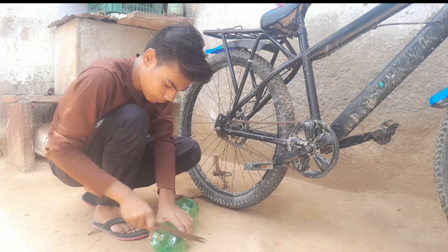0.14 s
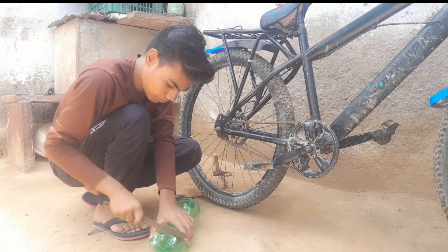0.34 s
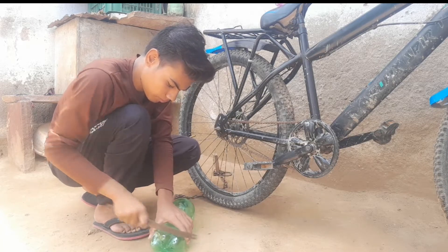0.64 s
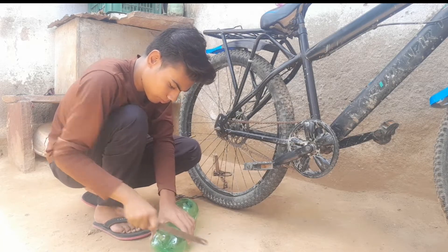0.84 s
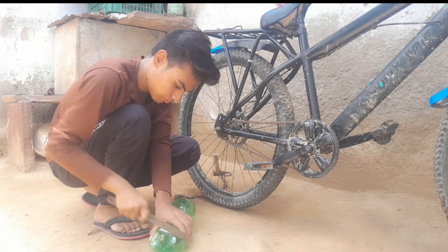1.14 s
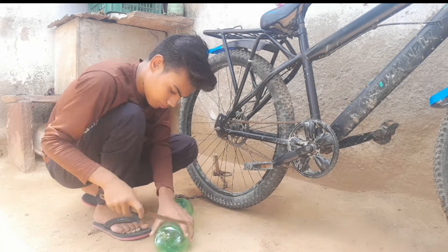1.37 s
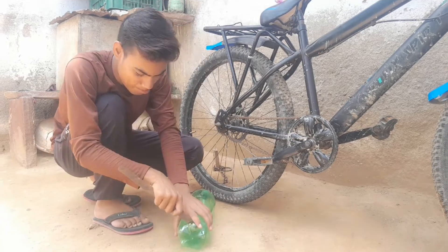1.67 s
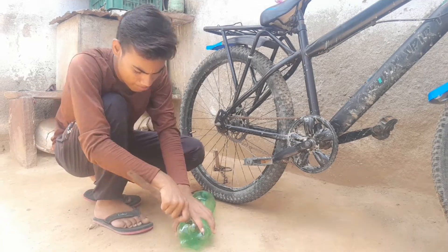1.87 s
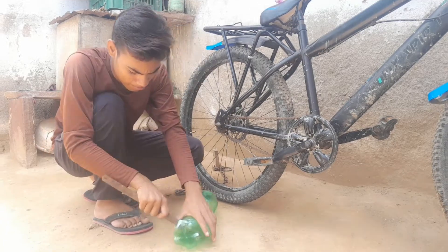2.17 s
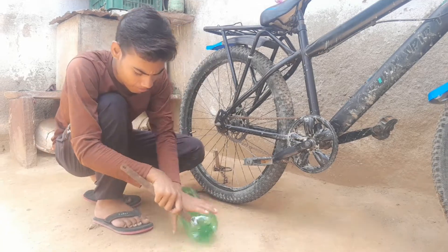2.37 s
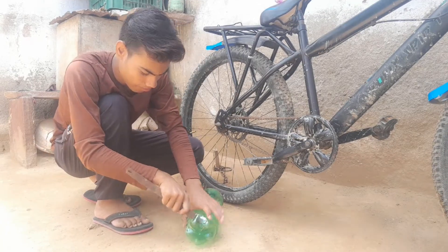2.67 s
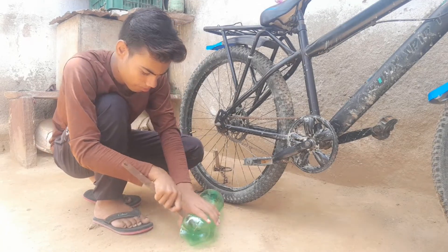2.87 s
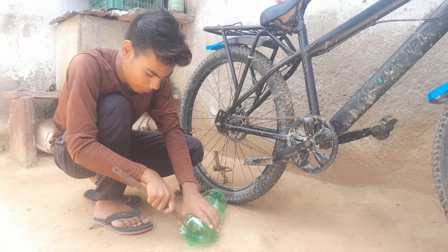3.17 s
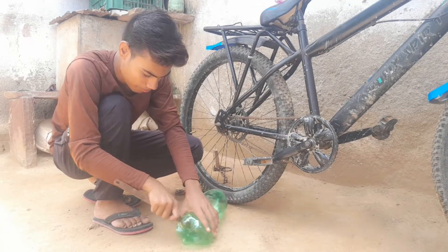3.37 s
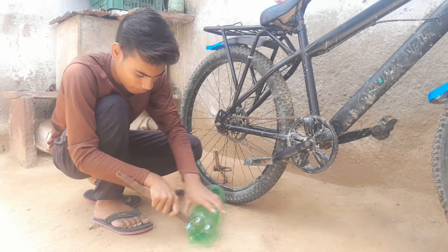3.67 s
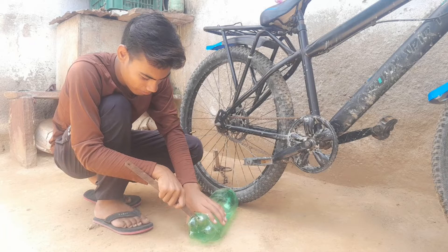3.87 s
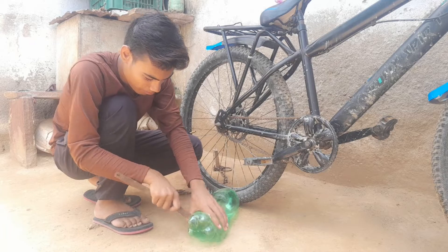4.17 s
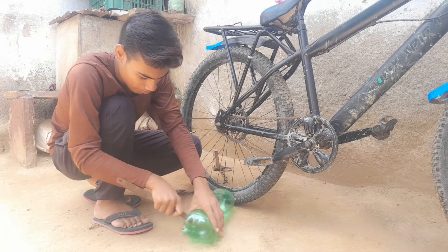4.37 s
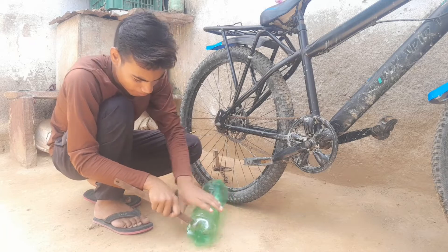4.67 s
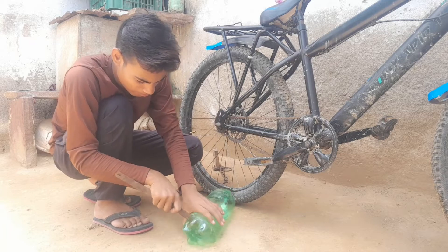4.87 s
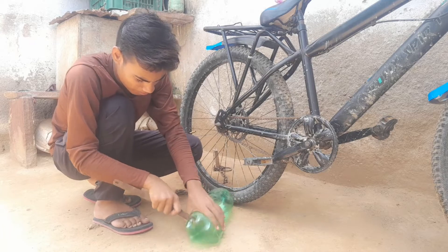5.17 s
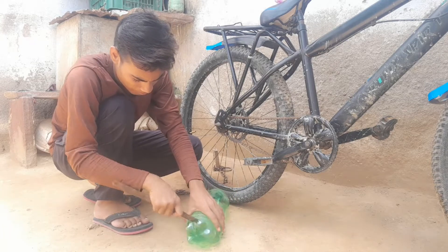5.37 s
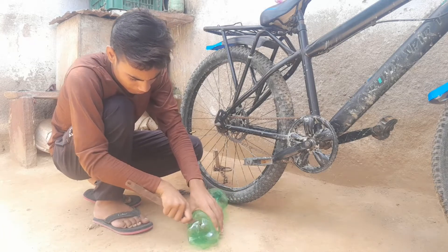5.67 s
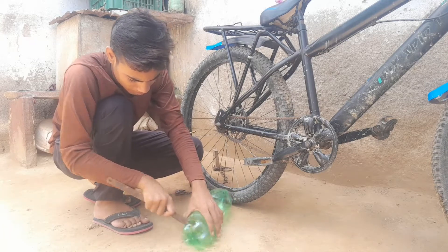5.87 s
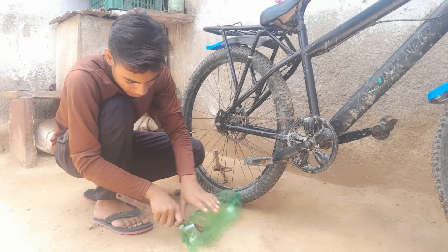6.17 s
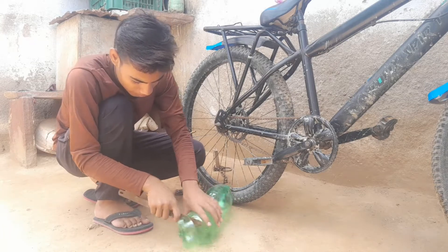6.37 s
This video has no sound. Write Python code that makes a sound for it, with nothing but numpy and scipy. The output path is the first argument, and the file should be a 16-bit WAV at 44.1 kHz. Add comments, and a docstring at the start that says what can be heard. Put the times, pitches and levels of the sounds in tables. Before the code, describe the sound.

Close stereo sound of a thin blade cutting an empty plastic bottle on sandy ground. Light, even sawing at about fifteen strokes a second lasts just over a second, with a faint dull bump. After a quieter moment come separate, uneven scrapes, hollow and raspy, among dry plastic snaps and one hollow knock. The strokes stop near six seconds, leaving faint rumble and rubbing in a walled yard.

```python
"""Cutting a plastic bottle in a yard

A thin blade cuts into an empty plastic bottle held on the ground of a walled yard, heard in stereo.
Quick light sawing gives way to single strokes, faint to hard: uneven noise forces ring the hollow shell.
Short noise bursts make the plastic snap, a decaying sine makes one hollow knock, and the walls answer.
Behind them are coloured noise for the bottle rubbing on the earth and an outdoor rumble, one dull bump,
and a faint mains hum of steady sines."""
import sys
import numpy as np
from scipy import signal
from scipy.fft import rfft, irfft, next_fast_len
from scipy.io import wavfile
from scipy.ndimage import map_coordinates

SR = 44100
rng = np.random.default_rng(int(sys.argv[2]) if len(sys.argv) > 2 else 0)


def unload_wav(signal):
    """Save mono or channel-first audio to the path in sys.argv[1] as 16-bit WAV at rate SR, clipped to [-1, 1]."""
    wavfile.write(
        sys.argv[1],
        SR,
        np.round(np.clip(np.atleast_2d(signal).T, -1, 1) * 32767).astype(np.int16),
    )


N = 287955

SIZE = 8192  # samples in one event
LEAD_S = 0.006  # silence ahead of each event
T = np.maximum(np.arange(SIZE) / SR - LEAD_S, 0)  # seconds since the event began
HZ = np.fft.rfftfreq(SIZE, 1 / SR)

# single strokes, from a last light sawing stroke and faint rubs to hard cuts;
# a hollow one flexes the whole bottle, a tearing one rasps, a loosely held one rings:
# start_s, end_s, level_db, hollowness_db, tearing_db, shell_ring_db, growth_db,
# belly_hz, wall_hz (resonances before the wall flexes)
STROKES = [(1.25, 1.296, -41, -3, -1.5, 1, -7, 630, 1530),
           (1.765, 1.837, -30.5, -9, 1.5, -3, -3, 803, 1266),
           (1.996, 2.036, -33, 9.5, -4.5, 0, 2, 760, 1200),
           (2.036, 2.059, -29.5, 3.5, 3.5, 9, 9, 710, 1290),
           (2.143, 2.164, -23.5, 0.5, 1, 10, 7, 520, 1206), (2.269, 2.306, -41, -3, 0, 14, -13, 600, 1360),
           (2.375, 2.394, -52, 3, -18, 14, -9, 497, 1260), (2.609, 2.672, -32, 2, -1, 7.5, 3, 382, 1310),
           (2.854, 2.885, -40, 1, -1.5, 17, 0, 644, 1320),
           (3.005, 3.049, -24.5, 1.5, -1, 7.5, -0.5, 603, 1380),
           (3.122, 3.21, -26.5, 2, -.5, 3.5, 1.5, 598, 1205),
           (3.283, 3.352, -24, -5, -2.5, 10.5, -2, 523, 1167),
           (3.397, 3.415, -34.5, 2, -1.5, 4, 11, 473, 1330), (3.492, 3.545, -29, 2, -2.5, 9, -4, 495, 1410),
           (3.608, 3.627, -29.5, -1, 1, 0, 15, 480, 1300), (4, 4.065, -27.5, -9, 1.5, 11, -2.5, 546, 1330),
           (4.139, 4.232, -30.5, 4, -0.5, 12, -3, 715, 1214),
           (4.308, 4.362, -26, -2.5, -1.5, 13.5, 0, 485, 1397),
           (4.502, 4.538, -29.5, 2, -2.5, 12, -5, 568, 1410),
           (4.97, 5.06, -26.5, -5.5, 0.5, 2.5, -2, 474, 1370),
           (5.11, 5.182, -33, 0, -2.5, 9, 10.5, 493, 1584), (5.273, 5.35, -41.5, 0, -4, 5, -5, 415, 1390),
           (5.505, 5.538, -34.5, 2.5, 2, 7, 4, 490, 1000), (5.584, 5.626, -47.5, 0, 0, 15, 7, 500, 1260),
           (5.651, 5.74, -27, -3, 1, 9, -9, 472, 1410), (5.83, 5.879, -29.5, 4, 2.5, 12, -6, 640, 1480),
           (5.961, 6.017, -25, 4.5, 2, 22, -1.5, 499, 1410), (6.063, 6.107, -43, 1, 0, 9, 2, 586, 1690)]


def amp(db):
    """Decibels to gain."""
    return 10 ** (np.asarray(db) / 20)


def unit(x):
    """Scale to rms 1."""
    return x / np.sqrt(np.mean(x ** 2) + 1e-20)


def along(points, hz):
    """Read (frequency in Hz, value) points on a log frequency axis."""
    point_hz, values = np.transpose(points)
    return np.interp(np.log(hz + 1), np.log(point_hz), values)


def over_time(points, seconds):
    """Read (time in s, value) points in straight lines."""
    return np.interp(seconds, *np.transpose(points))


def wobble(knots_per_s):
    """A smooth random curve through evenly spaced knots."""
    knots = rng.standard_normal(int(N * knots_per_s / SR) + 4)
    return map_coordinates(knots, [np.arange(N) * knots_per_s / SR])


def filtered(x, response):
    """Filter x by a gain that depends on frequency."""
    m = next_fast_len(N + SR // 2)
    spectrum = rfft(x, m) * response(np.fft.rfftfreq(m, 1 / SR))
    return irfft(spectrum, m)[..., :N]


def rush(colour):
    """Coloured noise of rms 1 (mid, side)."""
    noise = rng.standard_normal((2, N))
    return unit(filtered(noise, lambda hz: amp(along(colour, hz))))


def add(track, start_s, sound):
    """Mix in an event, with its lead-in, so that it starts at start_s."""
    first = max(round((start_s - LEAD_S) * SR), 0)
    part = track[:, first:][:, :SIZE]
    part += sound[:, :part.shape[1]]


def stereo(pair, width, left_db, bass_width=0.65):
    """Mid and side to left and right; the long waves reach both microphones more alike."""
    mid, side = pair
    side = width * filtered(side, lambda hz: along([(500, bass_width), (2200, 0.9)], hz))
    return np.array([mid + side, mid - side]) * amp([[left_db / 2], [-left_db / 2]])


def body(colour, modes):
    """Causal, minimum-phase response of the bottle: a broad colour lifted or lowered at each mode."""
    db = along(colour, HZ)
    for hz, width_hz, lift_db in modes:
        db = db + lift_db / (1 + ((HZ - hz) / width_hz) ** 2)
    # folding the cepstrum onto positive time leaves no sound ahead of the force
    cepstrum = irfft(np.log(amp(db)))
    cepstrum[1:SIZE // 2] *= 2
    cepstrum[SIZE // 2 + 1:] = 0
    return np.exp(rfft(cepstrum))


def lasting(x, length_s):
    """Give each row the energy of rms 1 held for length_s."""
    energy = np.sum(x ** 2, axis=-1, keepdims=True)
    return x * np.sqrt(length_s * SR / energy)


def range_levels(table, level_db, *colours_db):
    """Levels of belly, wall, rasp and hiss for one event of a given strength and colour."""
    return [level_db + offset_db + np.dot(slopes, colours_db) for offset_db, *slopes in table]


def ring(spectrum, levels_db, length_s):
    """Sound the bottle, with its belly, wall, rasp and hiss ranges each at its own strength."""
    # borders between the four ranges: border_hz
    borders_hz = [930, 2000, 3900]
    below = [1 / (1 + (HZ / hz) ** 20) for hz in borders_hz]
    bands = np.diff([0 * HZ, *below, 0 * HZ + 1], axis=0)
    sound = 0
    for level_db, band in zip(levels_db, bands):
        sound = sound + amp(level_db) * lasting(irfft(spectrum * band), length_s)
    return sound


def drag(length_s, growth_db, swell_db, attack_s, release_s, catches_per_s, catch_life_s, slide):
    """Force of one stroke (mid, side): the edge catches at uneven moments and slides in between."""
    u = np.clip(2 * T / length_s - 1, -1, 1)  # -1 at the start of the stroke, 1 at its end
    pressure = amp(growth_db * u / 2 - swell_db * u ** 2)
    pressure *= 1 - np.exp(-T / attack_s)
    pressure *= np.exp(-np.maximum(T - length_s, 0) / release_s)
    catches = (rng.random(SIZE) < catches_per_s / SR) * rng.uniform(0.77, 1, SIZE)
    tearing = unit(signal.lfilter([1], [1, -np.exp(-1 / (catch_life_s * SR))], catches))
    return pressure * (tearing + slide) * rng.standard_normal((2, SIZE))


def strokes(belly_lift_db=13, wall_lift_db=12, flex=0.037, swell_db_per_s=70, grazing_swell=0.32):
    """Single strokes on the wall; the grip sets the two lowest modes, long grazing ones swell midway."""
    # broad colour of the scraping: hz, level_db
    scrape = [(60, -30.5), (150, -23.5), (300, -8), (400, 0.5), (700, 3), (1000, -3), (1300, 2), (2000, -3),
              (3000, -7), (5500, -9.5), (7000, -21), (8800, -37), (10000, -58.5)]
    # higher resonances that ring alike in every stroke: hz, width_hz, lift_db
    shell = [(1704, 37, 7), (4160, 15, 6), (5200, 45, 7)]
    # two valleys and one slight lift between the resonances of the shell: hz, width_hz, lift_db
    between = [(900, 36, -5.5), (2150, 60, -2), (3080, 77, 0.5)]
    # as the cut lengthens the upper shell rings more freely:
    # hz, width_hz, lift_at_time_zero_db, growth_db_per_s
    loosening = [(3455, 68, -2, 2), (3540, 50, -3.5, 2)]
    # belly, wall, rasp and hiss of a stroke: offset_db, db_per_db_of_hollowness, db_per_db_of_tearing
    balance = [(-4, 1.1, .1), (0.04, -0.2, -0.63), (-3, -0.08, 1.14), (-8, -0.52, .5)]
    track = np.zeros((2, N))
    for start_s, end_s, level_db, hollow_db, tear_db, shell_db, growth_db, belly_hz, wall_hz in STROKES:
        length_s = end_s - start_s
        swell_db = swell_db_per_s * length_s - grazing_swell * hollow_db
        force = drag(length_s, growth_db, swell_db, attack_s=0.0006, release_s=0.0041,
                     catches_per_s=450, catch_life_s=0.0012, slide=1.0)
        upper = [(hz, width_hz, lift_db + rise * start_s) for hz, width_hz, lift_db, rise in loosening]
        steady = [(2515, 70, shell_db), *upper, *shell, *between]
        # the wall flexes under the blade, so its resonances slide during the stroke
        responses = []
        for bend in np.exp(flex * rng.standard_normal(2)):
            lowest = [(belly_hz * bend, 65, belly_lift_db), (wall_hz * bend, 90, wall_lift_db)]
            responses.append(body(scrape, [*lowest, *steady]))
        early, late = responses
        progress = np.clip(T / length_s, 0, 1)
        spectrum = rfft(force * (1 - progress)) * early + rfft(force * progress) * late
        levels_db = range_levels(balance, level_db, hollow_db, tear_db)
        add(track, start_s, ring(spectrum, levels_db, length_s))
    return stereo(track, width=0.58, left_db=2.0)


def sawing(count=18, first_middle_s=0.058, strokes_per_s=15.15, bite_share=0.54, level_db=-3.0,
           uneven_db=0.8, swell_db=4.0, uneven_swell_db=3, drift=0.033, extra_lift_db=0.5, vary_db=1.05):
    """The blade nicks back and forth at an even pace, each stroke biting and ringing a bit differently."""
    # how hard the blade is pressed, ahead of the overall level: time_s, relative_level_db
    effort = [(.05, -38), (.13, -35), (.4, -32.5), (.64, -31.5), (.9, -32.5), (1.19, -34)]
    # the still stiff bottle, ahead of drift and variation: hz, width_hz, lift_db
    stiff_modes = [(647, 71, 12.5), (1374, 170, 4.5), (2180, 85, 7), (2500, 190, 6.5), (3530, 73, 7),
                   (4180, 35, 8.5), (4820, 120, 9)]
    # broad colour of a nick: hz, level_db
    nick = [(100, -39), (300, -6.5), (600, -11.5), (900, -3.5), (1500, 0), (2000, -7), (2800, -2.5),
            (4000, -8), (5400, -8.5), (7000, -18.5), (8800, -36), (10000, -53)]
    track = np.zeros((2, N))
    length_s = bite_share / strokes_per_s
    for k, (strength, shape) in enumerate(rng.standard_normal((count, 2))):
        middle_s = first_middle_s + k / strokes_per_s
        stroke_db = over_time(effort, middle_s) + uneven_db * strength + level_db
        modes = []
        for hz, width_hz, lift_db in stiff_modes:
            drifted_hz = hz * np.exp(drift * rng.normal())
            modes.append((drifted_hz, width_hz, lift_db + extra_lift_db + vary_db * rng.normal()))
        force = drag(length_s, 0, swell_db + uneven_swell_db * shape, attack_s=0.001, release_s=0.0084,
                     catches_per_s=790, catch_life_s=0.002, slide=1.2)
        sound = irfft(rfft(force) * body(nick, modes))
        add(track, middle_s - length_s / 2, amp(stroke_db) * lasting(sound, length_s))
    return stereo(track, width=0.75, left_db=1.5, bass_width=1.0)


def snaps(burst_s=0.00075, length_s=0.008, creak_db=-25, creak_life_s=0.015):
    """Each snap is a millisecond burst that rings the shell, with a faint creak as the wall settles."""
    # the blade catches and the plastic snaps: peak_s, level_db, sharpness_db
    catches = [(1.1185, -41, 3), (1.2438, -37.5, 4), (1.34, -36, -2), (1.3812, -37.5, 12),
               (1.564, -49.5, 5.5), (1.6516, -48, 2.5), (1.7308, -48, 8.5), (1.7613, -37, 2.5),
               (1.8837, -40.5, -3.5), (1.9212, -33, -7), (1.9709, -44, -5), (1.9953, -31, -26),
               (2.1279, -22.5, -4.5), (2.2191, -32, -7), (2.2703, -34.5, -3), (2.3165, -36, 1.5),
               (2.4435, -42.5, -12), (2.5416, -45, -15), (2.5745, -34, -8), (2.5961, -29.5, 2),
               (2.6875, -27, 0), (2.7234, -45.5, 9), (2.8898, -28, -0.5), (2.944, -48, 1),
               (2.9813, -26.5, -7), (3.286, -33, 6), (3.3968, -32.5, -3.5), (3.4615, -35.5, -1),
               (3.4962, -27.5, -16), (3.6123, -32.5, 5), (3.7032, -36.5, -0.5), (3.7439, -41.5, 2),
               (3.942, -46, 1), (3.9936, -35, 11.5), (4.3046, -25.5, 0.5), (4.4041, -40, -8),
               (4.4459, -40, 6.5), (4.504, -28, -16), (4.5416, -24.5, -10), (4.5687, -42, 10),
               (4.8098, -36.5, 0.5), (4.8458, -30, 0), (4.9283, -42, -1), (5.251, -37.5, -2.5),
               (5.3137, -29.5, 4.5), (5.3457, -33, -1), (5.411, -38, 3), (5.4912, -34, 2.5),
               (5.5163, -32.5, -0.5), (5.6547, -29.5, 1), (5.7563, -32.5, 3), (5.7809, -39.5, 6),
               (5.805, -39, -5), (5.8768, -27.5, 6), (6.0575, -39.5, 12.5), (6.0877, -44, 7.5),
               (6.1839, -46, 6.5), (6.4261, -51.5, 0)]
    # broad colour of a snap: hz, level_db
    click = [(80, -42), (200, -29.5), (320, -4.5), (450, 5), (800, -0.5), (1300, 2), (2000, -1.5),
             (3000, -4.5), (5400, -5.5), (7000, -18.5), (8800, -32.5), (10000, -51)]
    # belly, wall, rasp and hiss of a snap: offset_db, db_per_db_of_sharpness
    balance = [(-6.5, 0.08), (-1.6, -0.2), (-5, 0.32), (-9, 1.07)]
    track = np.zeros((2, N))
    for peak_s, level_db, sharp_db in [*catches, *crackle()]:
        push = T / burst_s * np.exp(1 - T / burst_s)
        creak = amp(creak_db) * (T > 0) * np.exp(-T / creak_life_s)
        force = (push + creak) * rng.standard_normal((2, SIZE))
        bend = np.exp(0.034 * rng.standard_normal())
        response = body(click, [(490 * bend, 100, 7), (1300 * bend, 130, 9), (2510, 90, 4)])
        levels_db = range_levels(balance, level_db, sharp_db)
        add(track, peak_s - burst_s, ring(rfft(force) * response, levels_db, length_s))
    return stereo(track, width=0.26, left_db=2)


def crackle(below_db=-9, spread_db=3, count=24):
    """Small snaps at chance moments inside the single strokes: rows of peak_s, level_db, sharpness_db."""
    rows = []
    for which, when, size in rng.random((count, 3)):
        start_s, end_s, stroke_db, *_ = STROKES[int(which * len(STROKES))]
        level_db = stroke_db + below_db + spread_db * (2 * size - 1)
        rows.append((start_s + when * (end_s - start_s), level_db, 0))
    return rows


def pop(start_s=4.843, level_db=-15, hz=460, rise_s=0.0018, t60_s=0.039):
    """A dent springs back, and the belly of the bottle gives one hollow knock: a decaying sine."""
    track = np.zeros((2, N))
    envelope = amp(level_db - 60 * T / t60_s) * (1 - np.exp(-T / rise_s))
    knock = envelope * np.sin(2 * np.pi * hz * T)
    add(track, start_s, np.outer([1, 0], knock))  # mid only
    return stereo(track, width=0, left_db=2)


def yard(x, wet_db=-19, delay_s=0.006):
    """The walls answer with a short, diffuse tail: noise that decays at its own pace at each pitch."""
    # decay of the yard: hz, t60_s
    decay = [(200, 0.44), (1300, 0.16), (4000, 0.06), (9000, 0.11)]
    hz, t, z = signal.stft(rng.standard_normal((2, SR // 2)), SR, nperseg=256)
    fading = z * amp(-60 * t / along(decay, hz)[:, None])
    tail = signal.istft(fading, SR, nperseg=256)[1]
    tail = np.pad(tail / np.linalg.norm(tail[0]), ((0, 0), (round(delay_s * SR), 0)))
    return amp(wet_db) * signal.fftconvolve(x, tail, axes=1)[:, :N]


def ground(rumble_db=1, rub_db=1, grit_db=-55, grit_from_db=-48, grit_grows=1.75):
    """A low outdoor rumble, and the bottle rubbing unevenly on sandy earth: the harder, the grittier."""
    # colours of the rumble, the rubbing and the grit: hz, level_db
    rumble_colour = [(20, -14), (55, -19), (90, -7), (125, 1), (230, 2.5), (320, 0.5), (600, -9.5),
                     (1500, -53.5)]
    rub_colour = [(150, -22), (300, -10.5), (480, 2.5), (850, -0.5), (1300, 0.5), (1900, -6.5), (2500, -7),
                  (3500, -15), (8000, -69)]
    grit_colour = [(1200, -31), (2500, -0.5), (3500, 2.5), (5400, -1), (7000, -10.5), (8800, -32.5),
                   (10000, -35.5)]
    # outdoor rumble, ahead of its overall level: time_s, relative_level_db
    rumble_points = [(0, -53.5), (.6, -57), (1.3, -46.5), (1.55, -60.5), (2.05, -50.5), (2.5, -56.5),
                     (3.1, -52), (4.1, -60.5), (6.05, -59.5), (6.3, -71)]
    # how hard the bottle rubs, ahead of its overall level: time_s, relative_level_db
    rub_points = [(0, -48.5), (1.36, -47), (1.48, -58.5), (1.7, -54), (1.95, -49.5), (2.2, -47.5),
                  (2.36, -49), (2.5, -56), (2.66, -48.5), (2.78, -52.5), (3.08, -41), (3.3, -53),
                  (3.44, -48), (3.67, -50), (4.2, -43.5), (4.72, -52), (5.35, -47.5), (5.56, -54),
                  (5.7, -43), (5.91, -49), (6.03, -44), (6.14, -53.5), (6.31, -60), (6.42, -55)]
    t = np.arange(N) / SR
    rumble_level_db = over_time(rumble_points, t)
    rub_level_db = over_time(rub_points, t)
    grit = amp(grit_db + grit_grows * (rub_level_db - grit_from_db))
    shifting = amp(0.79 * wobble(50))
    grains = unit(amp(0.89 * wobble(700)))
    smooth_rub = amp(rub_db + rub_level_db) * rush(rub_colour)
    rubbing = shifting * (smooth_rub + grit * grains * rush(grit_colour))
    rumble = amp(rumble_db + rumble_level_db) * rush(rumble_colour)
    return stereo(rumble, width=0.58, left_db=-1.0) + stereo(rubbing, width=0.34, left_db=1)


def thud(start_s=0.777, level_db=-40, rise_s=0.0047, t60_s=1.0):
    """One dull, low bump during the sawing: low noise with a quick rise and a slow decay."""
    age = np.maximum(np.arange(N) / SR - start_s, 0)
    envelope = (1 - np.exp(-age / rise_s)) * amp(level_db - 60 * age / t60_s)
    boom = rush([(70, -36), (112, 6.5), (170, -3.5), (237, 2.5), (320, -25), (800, -55)])
    return stereo(envelope * boom, width=1.3, left_db=-7.0)


def hum(level_db=-1):
    """Something electrical hums far off: steady sines, alike on both sides."""
    # faint mains hum, ahead of its overall level: hz, relative_level_db
    partials = [(100, -77), (150, -74.5), (200, -69), (250, -68), (300, -65)]
    t = np.arange(N) / SR
    return sum(amp(db + level_db) * np.sin(2 * np.pi * (hz * t + rng.random())) for hz, db in partials)


def scene(lean_db_per_s=0.03, lean_from_s=3.5):
    """The bottle, leaning slowly to the left, and its echo over the background."""
    lean_db = lean_db_per_s * (np.arange(N) / SR - lean_from_s)
    bottle = sawing() + strokes() + snaps() + pop()
    bottle = bottle * amp([lean_db / 2, -lean_db / 2])
    return bottle + yard(bottle) + ground() + thud() + hum()


def record(dry, top_hz=9900):
    """The recorder cuts off steeply above its band limit."""
    return filtered(dry, lambda hz: 1 / np.sqrt(1 + (hz / top_hz) ** 80))


dry = scene()
out = record(dry)
unload_wav(out)
```